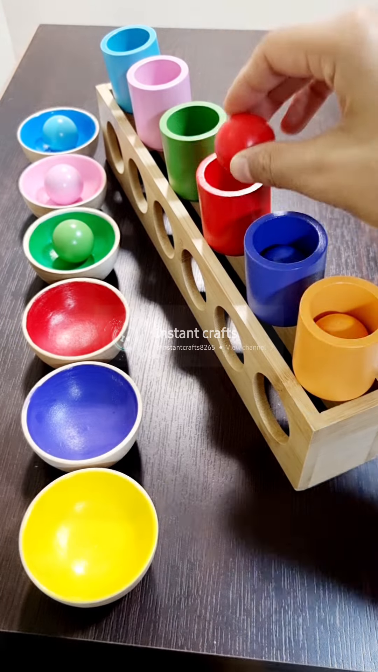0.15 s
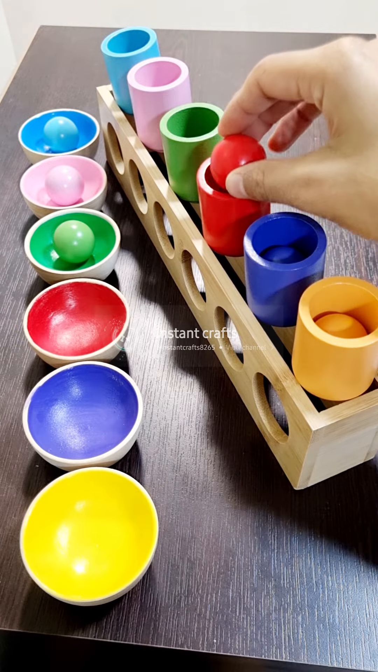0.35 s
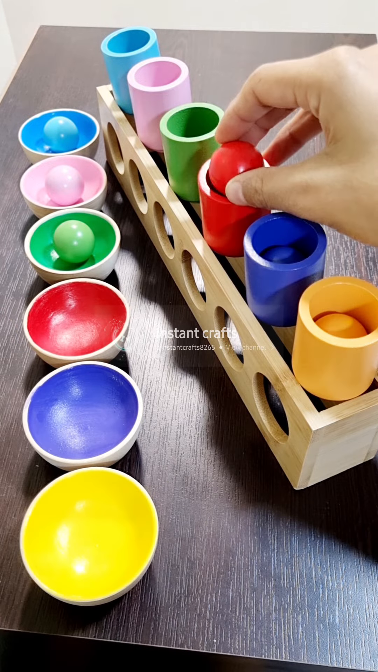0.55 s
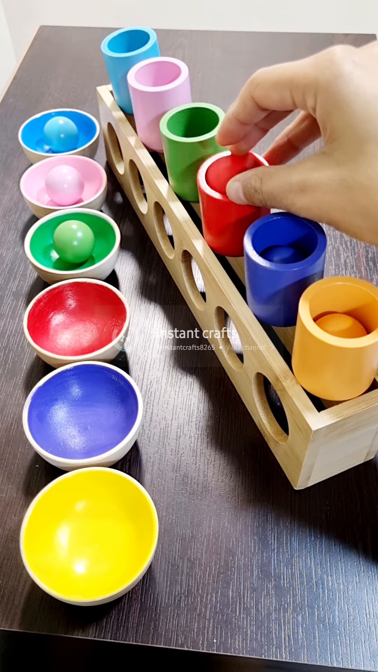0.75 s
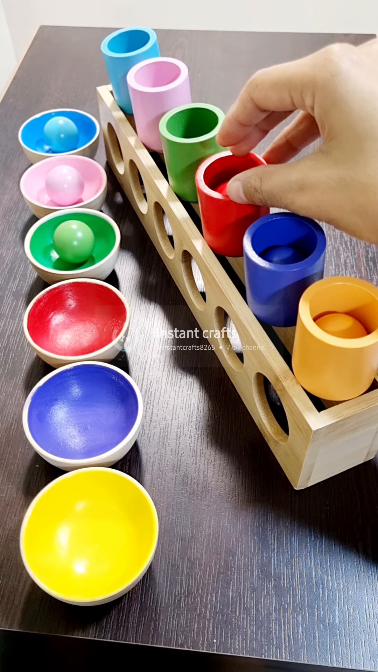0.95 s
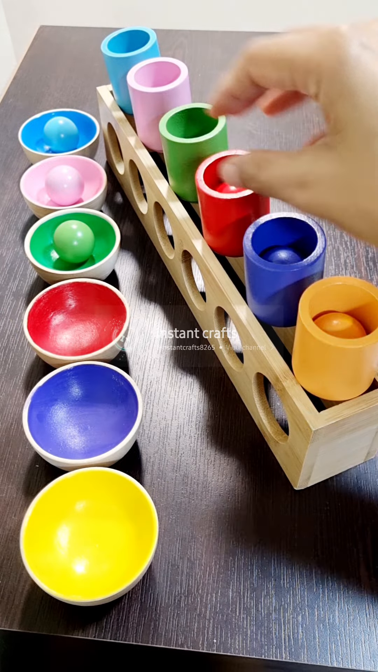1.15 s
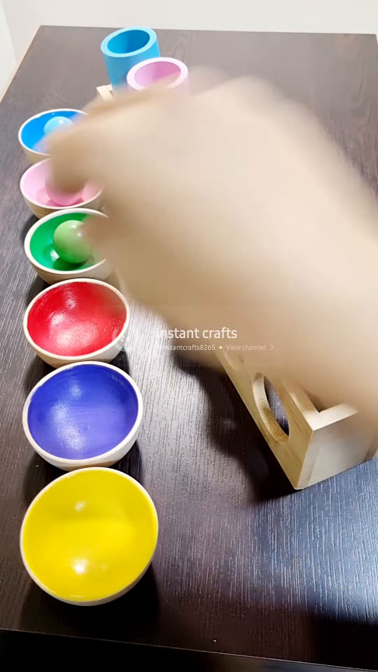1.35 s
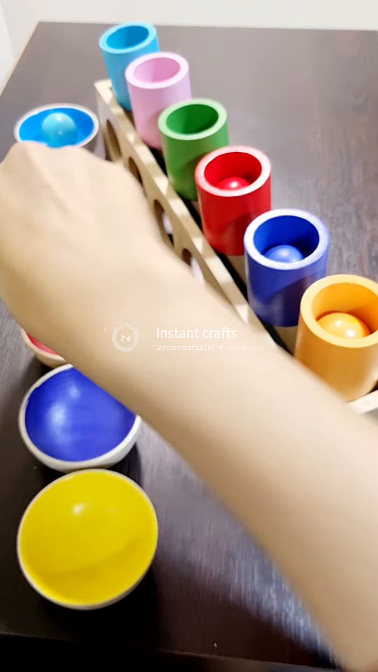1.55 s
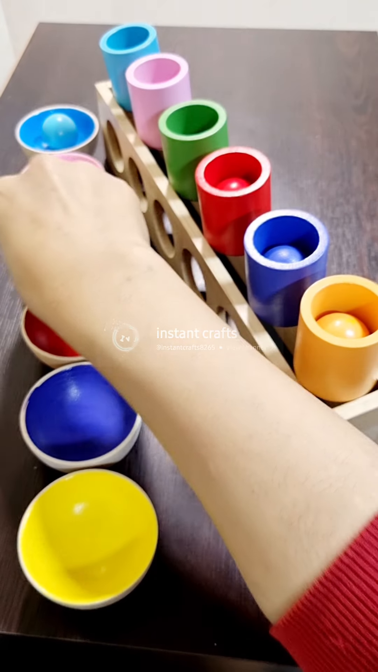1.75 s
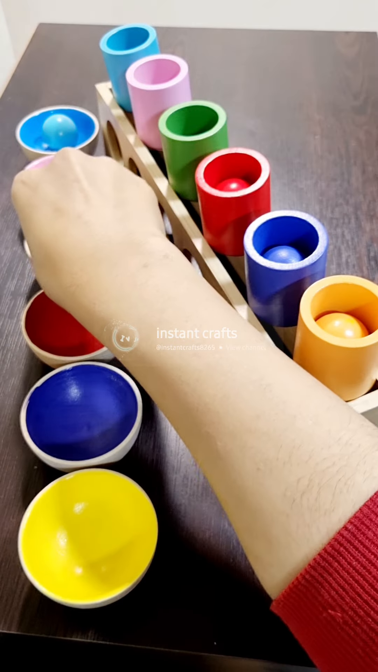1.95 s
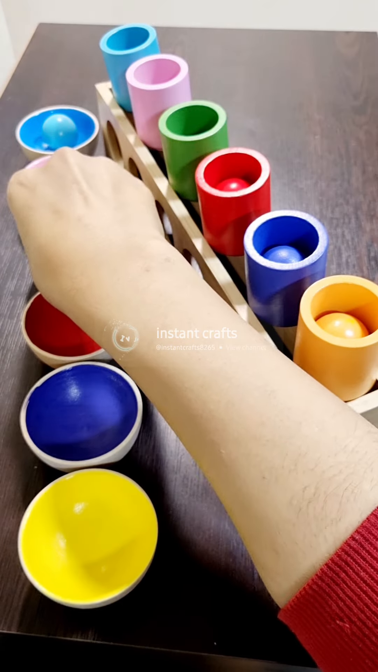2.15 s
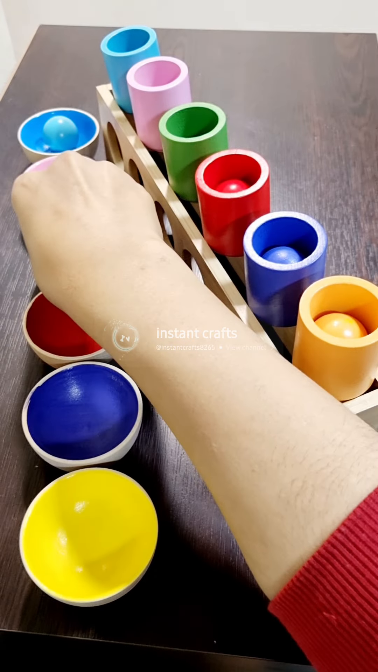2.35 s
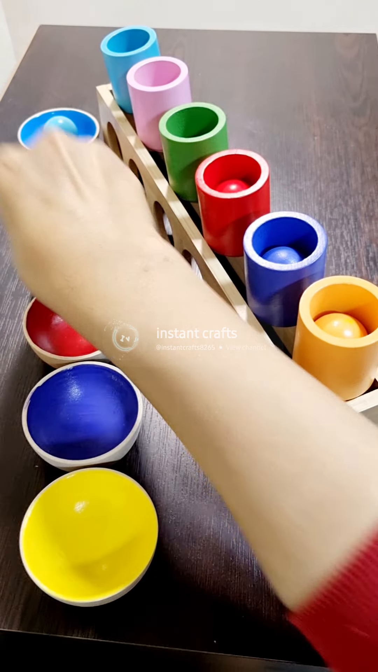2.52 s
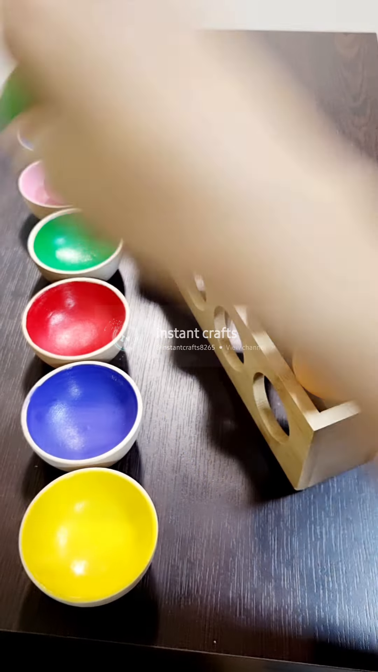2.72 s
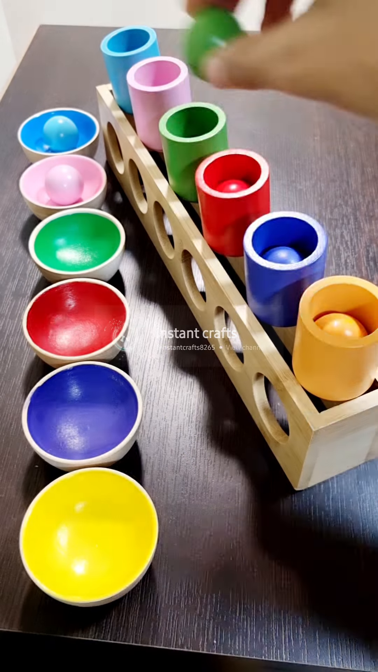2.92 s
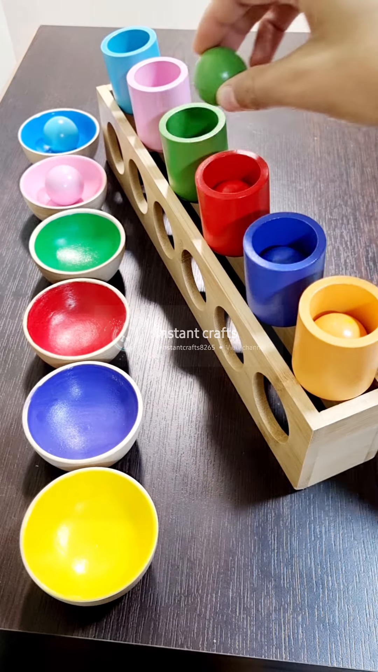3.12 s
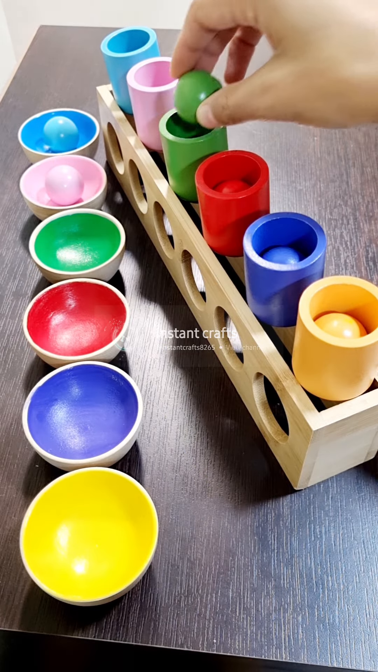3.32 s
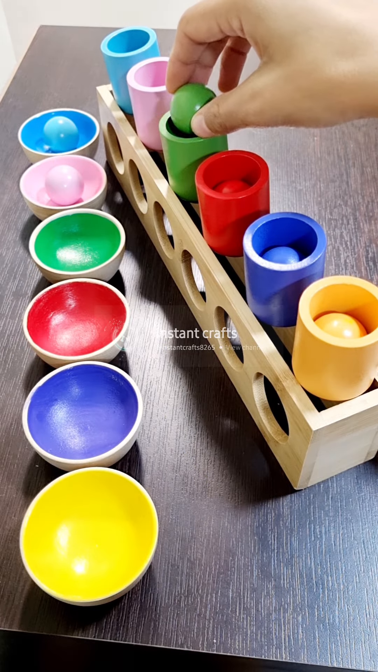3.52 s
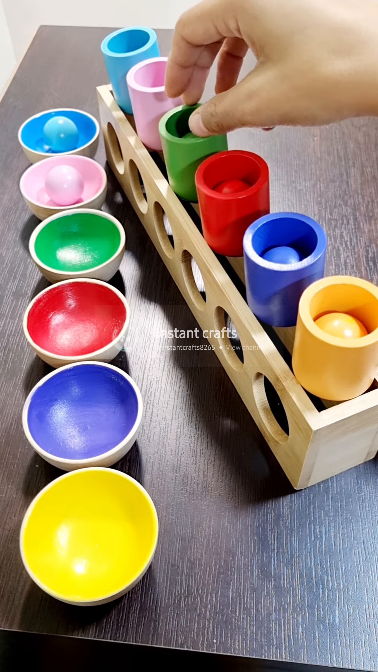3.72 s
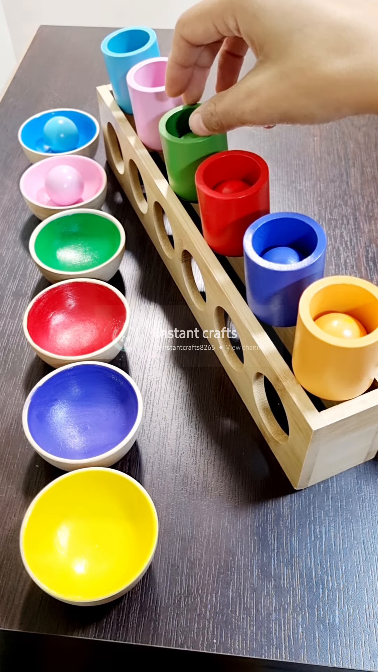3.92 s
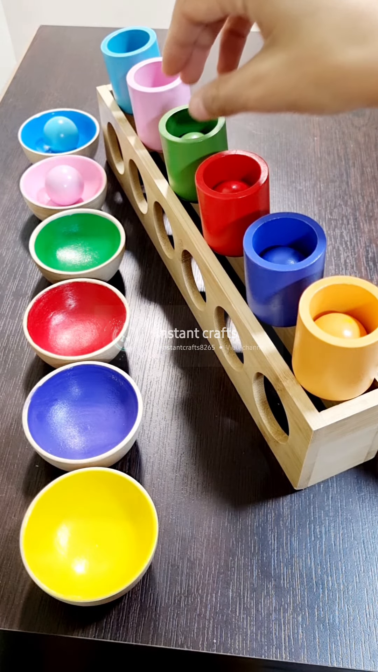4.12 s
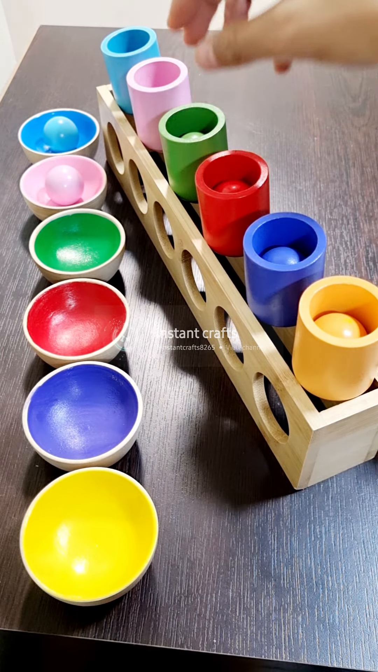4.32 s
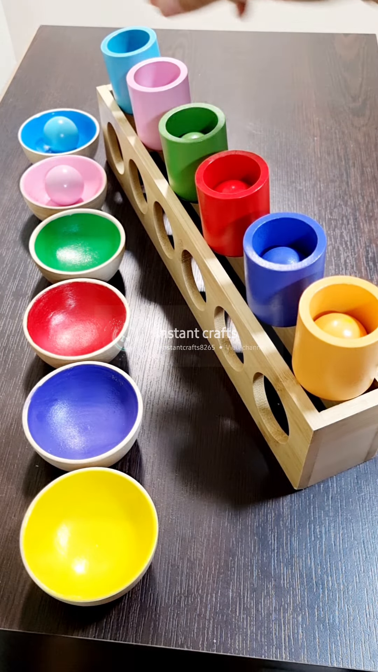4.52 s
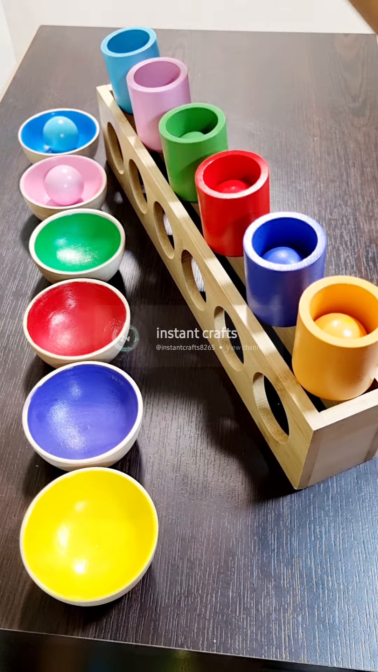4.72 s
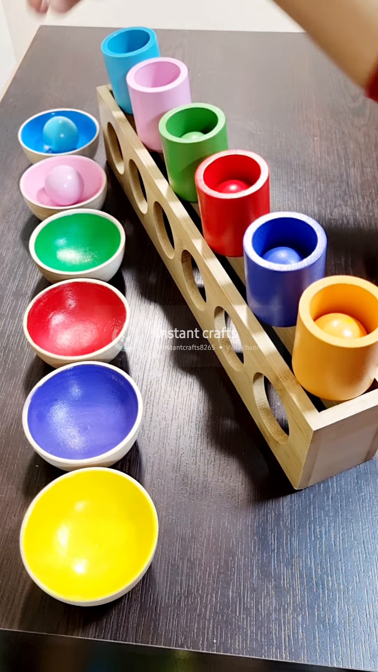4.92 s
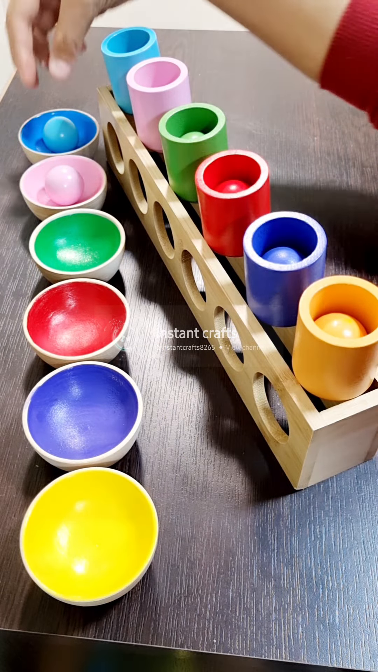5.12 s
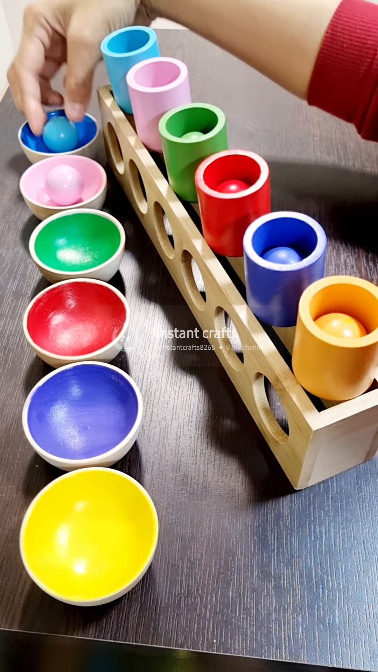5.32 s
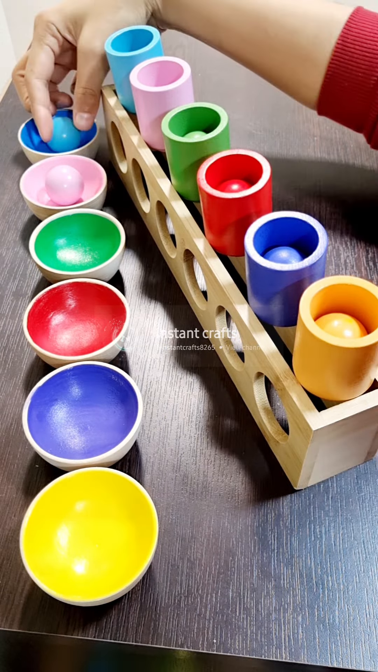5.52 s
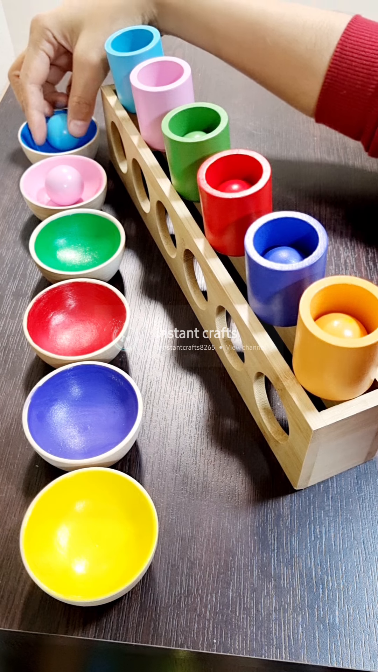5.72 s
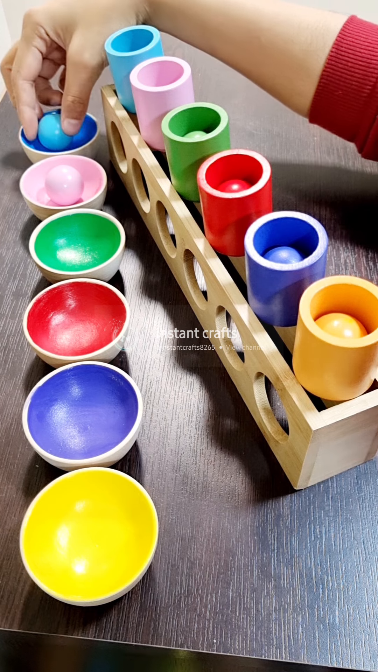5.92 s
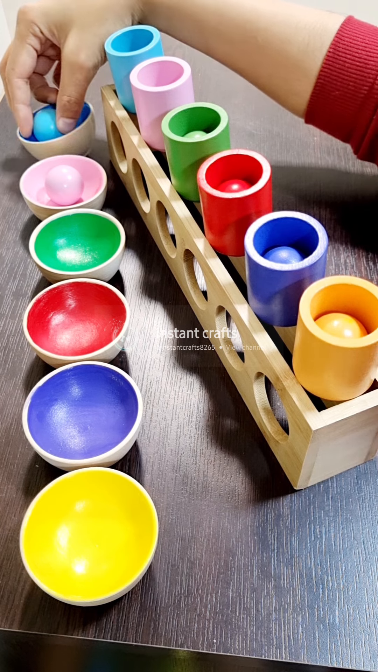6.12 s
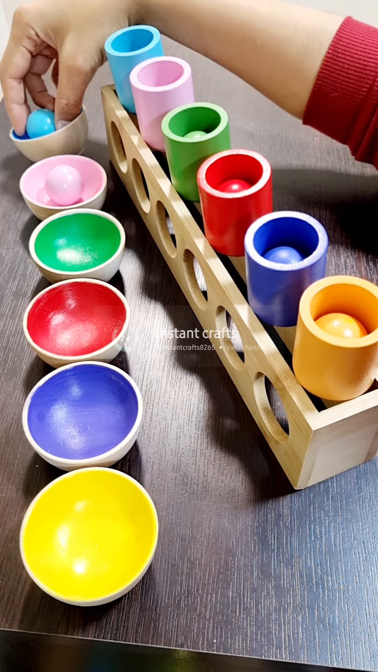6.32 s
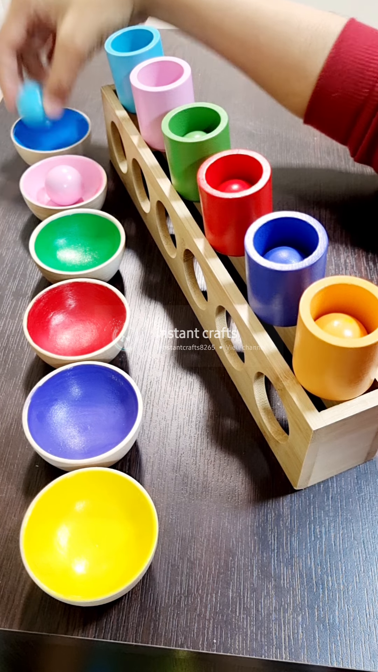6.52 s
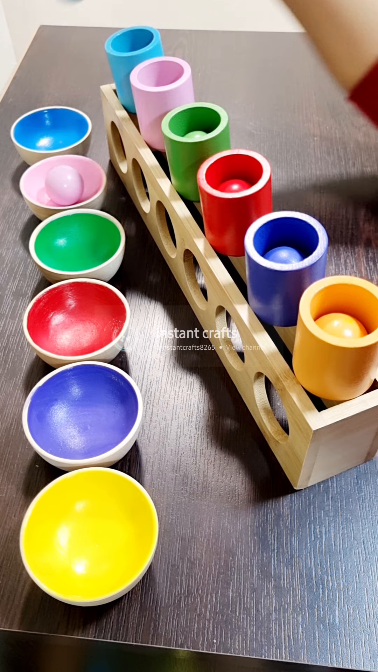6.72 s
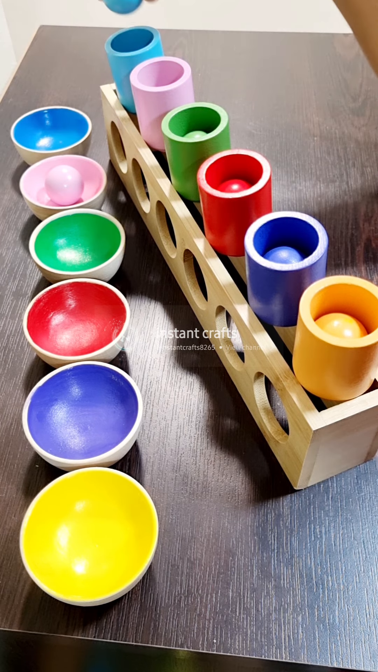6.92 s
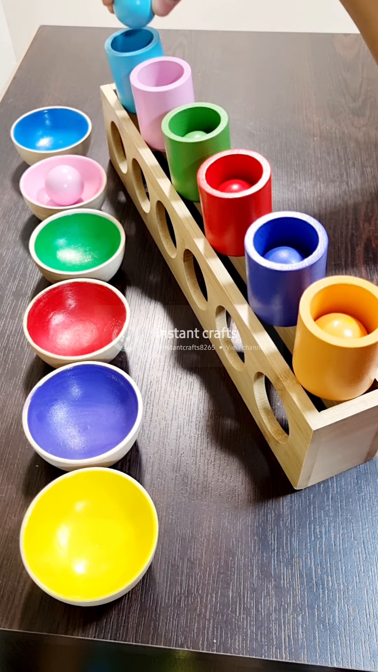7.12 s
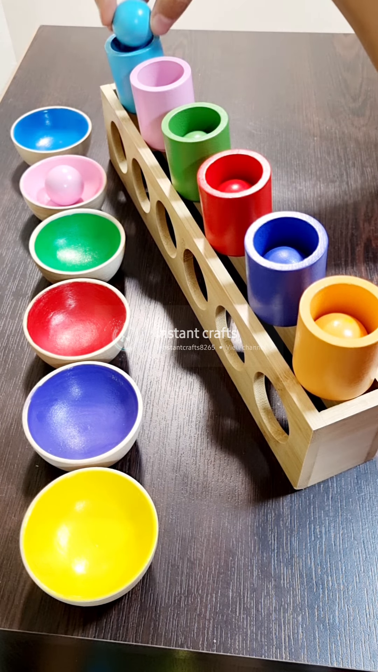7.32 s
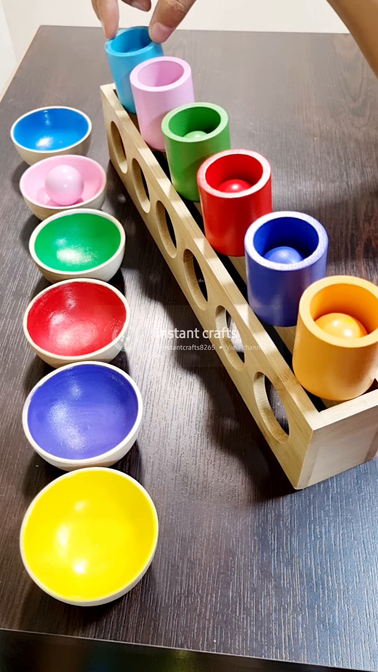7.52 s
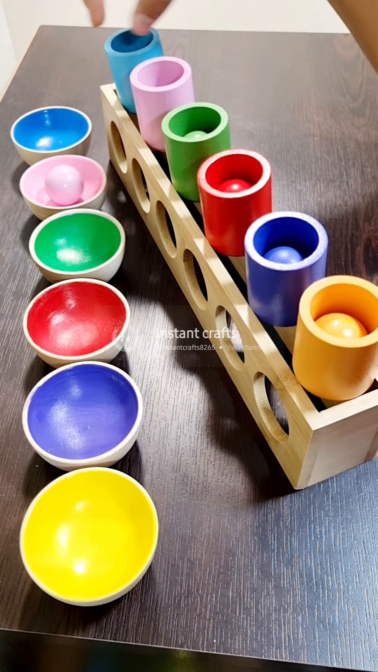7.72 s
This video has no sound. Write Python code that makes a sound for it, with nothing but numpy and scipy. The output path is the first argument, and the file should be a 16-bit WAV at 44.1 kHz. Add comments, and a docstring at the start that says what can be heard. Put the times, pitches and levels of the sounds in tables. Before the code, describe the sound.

Close stereo sound of a hand moving wooden balls into cups on a table. Isolated bright, woody knocks are separated by long near-silent gaps containing only dull rolling, faint finger rubbing and cloth friction. Two cup drops come first, then a loud bowl clack and one last rim click, scrape and drop with table boom. Small lively room, gentle low rumble and hum underneath.

```python
"""Wooden balls into wooden cups

Place: a table in a small live room, where a hand moves wooden balls from shallow bowls into tall cups.
Balls scuff down the cup wall (noise bursts) and land in knocks that ring filtered wood and boom the table.
Once a tilted bowl drops back; balls rolling, fingers and a sleeve rub faintly over a low rumble and hum.
Distance: the direct knock leads its echoes by about 1 ms. Microphone: stereo, knocks up to 0.11 ms apart."""
import sys
import numpy as np
from scipy import signal
from scipy.fft import rfft, irfft, next_fast_len
from scipy.io import wavfile
from scipy.ndimage import uniform_filter1d

SR = 44100
rng = np.random.default_rng(int(sys.argv[2]) if len(sys.argv) > 2 else 0)


def to_wav(sig):
    """Store sig (one row per channel, or 1-D mono) as 16-bit WAV at the path in sys.argv[1].

    Samples outside -1..1 are clipped; the rate is SR.
    """
    pcm = np.clip(np.atleast_2d(sig), -1, 1) * 32767
    pcm = np.round(pcm).astype(np.int16)
    wavfile.write(sys.argv[1], SR, pcm.T)  # frames by channels


N = 346626
TAPS = 4096  # length of one ringing piece of wood [samples]

# Wood strikes wood: (time [s], piece struck, relative level [dB], treble lift [dB], table boom [dB],
# room echo [dB], right channel louder by [dB]); boom and echo come on top of the knock's own level
KNOCKS = [(0.323, "rim", -8.5, 6.5, -27.5, -4, 1.5), (0.7818, "red", 2.5, 0, -8, -4.5, 3.5),
          (0.8016, "red", -8, -8.5, -10.5, -5.5, -1), (0.8076, "red", -7, -10.5, -12.5, -7, 0),
          (0.8166, "red", -11, -4, -11, -2.5, -3.5), (3.4869, "rim", -7.5, 0, -25.5, 1, 1),
          (3.6729, "green", 0, 7, -3.5, -1.5, 1.5), (3.6819, "green", -14.5, -12, -8.5, -6.5, 1),
          (5.661, "ball", -16, -3, -15, -4.5, 0.5), (5.878, "ball", -20.5, -1, -25.5, -4, 3.5),
          (6.2, "ball", -18, 7.5, -25, -1.5, 5), (6.483, "bowl", -1, 9.5, 1.5, -1, 0.5),
          (7.3642, "rim", -6.5, 3, -10, 2.5, 1), (7.487, "blue", 0, 8.5, 3.5, -1, 1),
          (7.5344, "blue", -3.5, -22, 0, -1.5, 0.5)]


def knocks():
    """Each contact rings its piece of wood, heard directly, through the table top and off the walls."""
    out = np.zeros((2, N))
    lead_s = 0.001  # room ahead of the blow for the start of its pulse
    fade = np.minimum(np.linspace(2, 0, TAPS), 1) ** 2
    boom, standing = table_boom(), room_standing_waves()
    for time_s, name, db, treble_db, boom_db, room_db, right_db in KNOCKS:
        wood = struck_wood(name, db, treble_db)
        direct = direct_sound(wood, name, lead_s) * fade
        echo = room(irfft(wood) * fade)
        balance = amp([[-right_db / 2], [right_db / 2]])
        add(out, time_s - lead_s, amp(0.13) * balance * direct)
        add(out, time_s, amp(room_db) * balance * echo)
        add(out, time_s, amp(db) * (amp(boom_db) * boom + standing))
    return out


# Broad colour of a blow on a cup, on a ball damped by the fingers, and on a bowl:
# (frequency before the piece's factor [Hz], relative level [dB])
CUP_BODY = [(50, -4.5), (160, 6), (300, 14), (600, 5.5), (1000, 8.5), (1700, 15), (2400, 9.5), (3700, 5.5),
            (4400, 1), (5000, -6), (6800, -12), (8600, -26), (14500, -18), (18000, -36)]
BALL_BODY = [(100, -18), (300, 1), (600, 3), (850, -13), (1500, -31), (3000, -41.5), (15000, -56.5)]
BOWL_BODY = [(50, -5.5), (160, -1), (300, 19.5), (430, 7), (800, 6), (1500, 10), (3200, 12.5), (4200, 9),
             (5200, -3), (7800, -12), (10500, -18), (16000, -33.5)]
# Resonances standing out of the broad colour, cups named by colour: (frequency [Hz], width [Hz], gain [dB])
RED_MODES = [(456, 31, 10.5), (490, 28, 13), (693.6, 13, 5), (908, 56, 11.5), (1180, 61, 3.5),
             (1360, 48, 6.5), (1538, 136, 0.5), (1730, 370, 12.5), (2262, 390, 4.5), (2840, 158, 1),
             (3330, 320, 9.5), (4130, 450, 9.5)]
GREEN_MODES = [(324, 70, 10), (367, 30, 6.1), (449, 22, 12), (476, 28, 13), (670, 45, 9.4), (780, 85, 7.2),
               (969, 39, 8), (1175, 76, 9.7), (1827, 520, 16), (3220, 450, 6.3), (3980, 450, 7.6),
               (4700, 480, 14)]
BLUE_MODES = [(394, 500, 7.9), (570, 15, 3.6), (675, 32, 7), (803, 87, 5.3), (1176, 45, 8.8),
              (1428, 130, 9.2), (1684, 330, 6.1), (1950, 500, 5.1), (2810, 300, 7.3), (3270, 240, 9.5),
              (3760, 150, 5.9), (5120, 650, 5.2)]
BOWL_MODES = [(215, 35, 7.3), (443, 29, 4.2), (545, 128.7, 6.7), (659, 45, 15), (851, 40, 11.5),
              (939, 130, 5.6), (1436, 100, 9), (1790, 460, 6.9), (2380, 120, 2.79), (2880, 67, 3.2),
              (3580, 210, 1.4), (4380, 300, 6.1)]
# The pieces by name: (broad colour, factor on its frequencies, resonances,
# thin top ping as (frequency [Hz], width [Hz], gain [dB]))
PIECES = {"red": (CUP_BODY, 0.92, RED_MODES, (11600, 1800, 11)),
          "green": (CUP_BODY, 0.91, GREEN_MODES, (15000, 3500, 13)),
          "blue": (CUP_BODY, 1, BLUE_MODES, (14000, 800, 12)),
          "bowl": (BOWL_BODY, 0.83, BOWL_MODES, (13000, 970, 3)), "ball": (BALL_BODY, 1.0, [],
          (7400, 1800, 3.79)), "rim": (BALL_BODY, .8, [(1540, 640, 35.5), (3057, 500, 19.5)],
          (7700, 900, 22))}


def struck_wood(name, db, treble_db, treble_hz=3400.0):
    """Spectrum of a struck piece: broad colour plus resonances, in minimum phase so it rings after the blow."""
    hz = np.fft.rfftfreq(TAPS, 1 / SR)
    body, pitch, modes, ping = PIECES[name]
    colour_db = read(body, hz / pitch) + peaks([*modes, ping], hz)
    lift_db = treble_db * hz ** 2 / (hz ** 2 + treble_hz ** 2)
    log_gain = np.log(amp(db + colour_db + lift_db))
    # the Hilbert transform of the log gain gives the minimum phase
    mirrored = np.r_[log_gain, log_gain[-2:0:-1]]
    phase = -signal.hilbert(mirrored).imag[:len(hz)]
    return np.exp(log_gain + 1j * phase)


# Where each piece stands: name: (right channel hears it later by [ms])
LAG_MS = {"red": 0.11, "green": -0.097, "blue": .1, "bowl": -0.033, "ball": 0., "rim": 0.034}


def direct_sound(wood, name, lead_s):
    """The straight path: the contact drives the wood, and the farther channel hears it later."""
    hz = np.fft.rfftfreq(TAPS, 1 / SR)
    lag_ms = np.array([[-LAG_MS[name]], [LAG_MS[name]]])
    delays_s = lead_s + np.maximum(lag_ms, 0) / 1000
    return irfft(wood * contact(hz) * np.exp(-2j * np.pi * hz * delays_s))


def contact(hz, spread_ms=1.1, spread_hz=2900.0, chatter_s=0.0021, chatter_hz=4600.0):
    """Spectrum of one contact: a pulse whose low part lags as a bending wave, and a brief treble chatter."""
    lag_s = spread_ms / 1000 * np.exp(-(hz / spread_hz) ** 2)
    late = 2 * np.pi * np.cumsum(lag_s) * hz[1]
    chatter = rng.standard_normal(TAPS) * np.exp(-np.arange(TAPS) / SR / chatter_s)
    chatter_spectrum = rfft(chatter / np.linalg.norm(chatter))
    share = hz ** 2 / (hz ** 2 + chatter_hz ** 2)  # the chatter's share of the power
    return np.sqrt(1 - share) * np.exp(-1j * late) + np.sqrt(share) * chatter_spectrum


# Modes of the table top: (frequency [Hz], relative level [dB], 60 dB decay [s])
TABLE = [(224, -24, 0.15), (225.7, -18, 0.2), (232.6, -30, 0.45), (248.5, -26, 0.25), (337, -41, 0.45),
         (374.7, -38, 0.18)]


def table_boom():
    """A blow sets the low modes of the table top swinging."""
    return ring(TABLE, rise=0.021)


# Standing waves of the room: (frequency [Hz], relative level [dB], 60 dB decay [s])
ROOM_MODES = [(88, -33.5, 0.41), (124.24, -34.5, 0.39)]


def room_standing_waves():
    """Standing waves between the walls, slow to build."""
    return ring(ROOM_MODES, rise=0.029)


def ring(modes, rise):
    """Low modes take a time constant, rise [s], to swing up, then hum out, alike in both channels."""
    t = np.arange(SR) / SR
    swing = np.zeros(SR)
    for hz, db, t60 in modes:
        swing += amp(db) * np.exp(-np.log(1000) * t / t60) * np.sin(2 * np.pi * hz * t)
    return swing * (1 - np.exp(-t / rise)) * np.ones((2, 1))


# A ball scuffs the cup wall on its way in; the abrupt one at 7.36 s is the bright edge of its knock
# on the rim: (start [s], rise [s], 20 dB fade [s], relative level [dB])
SCUFFS = [(.658, .066, .04, -48), (3.56, .05, 0.17, -43.5), (7.36, 0.0032, 0.025, -39.5),
          (7.385, .035, 0.24, -45.5)]
# Their broad colour: (frequency [Hz], relative level [dB])
SCUFF_BODY = [(100, -10), (350, 7), (800, -0.5), (1500, -8.5), (2300, -17), (4200, -21), (9000, -38.5),
              (14000, -26.5), (16000, -48.5)]
# Their resonances: (frequency [Hz], width [Hz], gain [dB])
SCUFF_MODES = [(1440, 260, 14.5), (3080, 420, 20.5), (7320, 830, 22.5), (10500, 1000, 12),
               (14400, 900, 7.5)]


def scuffs():
    """Slips of a ball on the cup wall, and the bright edge of one rim knock, excite the wood."""
    return amp(-7.5) * rub(SCUFFS, SCUFF_BODY, SCUFF_MODES, slips_per_s=950, hiss=0.57, room_db=3.0, grip_db=2.5)


# Fingers roll a ball in its bowl: (start [s], rise [s], 20 dB fade [s], relative level [dB])
ROLLS = [(1.735, 0.061, 0.1, -46.5), (2.02, 0.043, 0.11, -51.5), (2.24, 0.073, .15, -68),
         (5.41, 0.072, 0.032, -56), (5.63, .03, 0.043, -58)]
# Its broad colour: (frequency [Hz], relative level [dB])
ROLL_BODY = [(100, -11), (230, 6), (360, -1), (720, -5.5), (1150, -16.5), (1600, -27.5), (3000, -48),
             (8000, -70)]
# The bowl under the ball: (frequency [Hz], width [Hz], gain [dB])
ROLL_MODES = [(490, 99, 7), (720, 170, 5), (1110, 180, 7)]


def rolls():
    """A rolling ball drives the low resonances of its bowl with small slips."""
    return amp(0.5) * rub(ROLLS, ROLL_BODY, ROLL_MODES, slips_per_s=370, hiss=0.49, room_db=-4, grip_db=0.5)


# Fingertips slide on paint: (start [s], rise [s], 20 dB fade [s], relative level [dB])
FINGERS = [(.36, .04, 0.034, -74), (1.76, .045, .03, -76.5), (1.87, 0.024, 0.065, -74.5),
           (2.15, 0.086, 0.17, -77), (2.265, 0.044, 0.052, -67.5), (5.4, 0.053, 0.04, -60.5),
           (5.57, 0.07, .08, -73.5), (5.7, 0.082, .16, -74.5)]
# Their broad colour: (frequency [Hz], relative level [dB])
FINGER_BODY = [(760, -34.5), (1300, 2), (2080, -4), (2580, -14), (2770, -16), (4390, -14), (5120, -20),
               (6420, -14), (8460, -17), (11500, -26), (15000, -32)]
# A faint squeak: (frequency [Hz], width [Hz], gain [dB])
FINGER_MODES = [(3400, 250, 7), (8600, 800, 8), (10200, 830, 1)]


def fingers():
    """Skin sliding on paint: more hiss than slips, with a faint squeak."""
    return amp(-6.0) * rub(FINGERS, FINGER_BODY, FINGER_MODES, slips_per_s=560, hiss=2, room_db=3, grip_db=3.0)


# The sleeve brushes as the arm moves: (start [s], rise [s], 20 dB fade [s], relative level [dB])
SLEEVE = [(1.38, .14, .3, -84), (4.08, 0.041, .2, -71), (4.16, 0.055, 0.09, -67.5), (4.46, .04, 0.1, -60.5),
          (4.45, 0.41, 0.46, -69.5), (4.85, 0.11, 0.31, -70.5)]
# Its broad colour: (frequency [Hz], relative level [dB])
SLEEVE_BODY = [(1060, -13.5), (1800, -4), (2280, -6.5), (2620, -11.5), (3320, -11), (6840, -19.5),
               (11000, -23), (13000, -19), (14900, -23), (16000, -40)]


def sleeve():
    """Cloth friction: dense slips without resonances."""
    return amp(-6.5) * rub(SLEEVE, SLEEVE_BODY, [], slips_per_s=1600, hiss=0.79, room_db=6.0, grip_db=2)


def rub(strokes, body, modes, slips_per_s, hiss, room_db, grip_db):
    """Friction: tiny random slips over a smooth hiss drive the rubbed body, while the grip comes and goes."""
    size = next_fast_len(N)
    hz = np.fft.rfftfreq(size, 1 / SR)
    slips = rng.standard_normal(size) * (rng.random(size) < slips_per_s / SR)
    drive = rfft(unit(slips) + hiss * rng.standard_normal(size))
    colour = amp(read(body, hz) + peaks(modes, hz))
    friction = unit(irfft(drive * colour, size))[:N]
    grip = unit(uniform_filter1d(rng.standard_normal(N), size=400))  # smoothed over 9 ms
    sound = friction * effort(strokes) * amp(grip_db * grip)
    return sound + amp(room_db) * room(sound)[:, :N]


def effort(strokes):
    """Gain of a set of strokes: each swells smoothly to its peak, then drops 20 dB per fade time."""
    t, power = np.arange(N) / SR, np.zeros(N)
    for start, rise, fade, db in strokes:
        swell = np.sin(np.pi / 2 * np.clip((t - start) / rise, 0, 1)) ** 2
        release_db = -20 * np.clip((t - start - rise) / fade, 0, 10)
        power += (swell * amp(db + release_db)) ** 2
    return np.sqrt(power)


# Echo colour of the room: (frequency [Hz], relative level [dB])
ROOM_LEVEL = [(70, 14.5), (120, 13), (165, 2), (215, 7), (300, -0.5), (600, 5), (1000, 6), (1750, 1),
              (3000, 2.5), (5000, 0), (9000, 1.5), (14000, -3.5)]
# How long the echoes last: (frequency [Hz], 60 dB decay [s])
ROOM_T60 = [(100, 0.84), (300, .42), (800, 0.49), (1800, 0.56), (4000, 0.49), (6500, 0.35), (9000, 0.18),
            (14000, 0.32)]


def room(x, gap_s=0.00098, build_s=0.00085, early=0.61, early_s=0.074):
    """Echoes from one spot: strong near reflections, then a tail with each band dying at its own speed."""
    hz, t, z = signal.stft(irfft(diffuse(SR)[1]), SR, nperseg=512)
    rate = np.log(1000) / np.maximum(read(ROOM_T60, hz), .05)[:, None]
    # the square root evens out the energy of short and long tails
    z = z * amp(read(ROOM_LEVEL, hz))[:, None] * np.sqrt(2 * rate / SR) * np.exp(-rate * t)
    tail = signal.istft(z, SR, nperseg=512)[1][:, :SR]
    t = np.arange(SR) / SR
    onset = np.clip((t - gap_s) / build_s, 0, 1)
    near = (1 + early * np.exp(-(t / early_s) ** 2)) / (1 + early / 2)
    return signal.fftconvolve(x[None], onset * near * tail, axes=1)


# Likeness of the stereo channels: (frequency [Hz], left-right correlation [-1 to 1])
ROOM_SAME = [(100, 0.98), (250, 0.88), (500, 0.47), (1000, -0.27), (2000, 0.013), (8000, -0.13)]


def diffuse(size):
    """Spectrum of noise arriving from all sides: closely alike in both channels only in the bass."""
    hz = np.fft.rfftfreq(size, 1 / SR)
    a, b = rfft(rng.standard_normal((2, size)))
    same = np.clip(read(ROOM_SAME, hz), -1, 1)
    return hz, np.array([a, same * a + np.sqrt(1 - same ** 2) * b])


# The quiet room: (frequency [Hz], relative level [dB per Hz])
AIR = [(12, -57.5), (20, -21), (58, -11.5), (79, -2), (98, -3), (187, -17), (222, -13), (285, -16.5),
       (377, -30.5), (410, -27.5), (642, -36), (825, -33), (1290, -32.5), (3950, -63), (16000, -67)]
# Its hum lines: (frequency [Hz], rms level [dB])
HUM = [(82, -65.5), (99, -57), (224, -65), (279, -66)]


def background(air_db=-50.5, hum_width_hz=2.5):
    """Low rumble of the room, shaped noise, with hum lines that waver as narrow bands of noise."""
    size = next_fast_len(N)
    hz, z = diffuse(size)
    sound = amp(air_db) * unit(irfft(z * amp(read(AIR, hz)), size))
    z = diffuse(size)[1]
    for line_hz, db in HUM:
        line = z / (1 + ((hz - line_hz) / hum_width_hz) ** 4)
        sound += amp(db) * unit(irfft(line, size))
    return sound[:, :N]


def amp(db):
    """Decibels to gain."""
    return 10 ** (np.asarray(db) / 20)


def unit(x):
    """Scales to an rms of one."""
    return x / np.sqrt(np.mean(x ** 2) + 1e-20)


def read(points, hz):
    """Joins (frequency [Hz], value) points by straight lines on a log-frequency axis."""
    f, value = np.transpose(points)
    return np.interp(np.log(hz + 1), np.log(f + 1), value)


def peaks(modes, hz):
    """Gain in dB of a set of resonances."""
    return sum(db / (1 + (2 * (hz - f) / width) ** 2) for f, width, db in modes)


def add(mix, time_s, sound):
    """Mixes a stereo sound in at a time."""
    part = mix[:, round(time_s * SR):][:, :sound.shape[1]]
    part += sound[:, :part.shape[1]]


def scene():
    """Knocks, handling noise and the room."""
    return knocks() + scuffs() + rolls() + fingers() + sleeve() + background()


def record(dry, ceiling=1.0, edge_hz=16000):
    """The microphone signal: the sharpest peaks are rounded off, then a low-pass limits the band."""
    limited = dry / (1 + (dry / ceiling) ** 4) ** (1 / 4)
    low_pass = signal.firwin(255, edge_hz, window=("kaiser", 8), fs=SR)
    return signal.oaconvolve(limited, low_pass[None], "same")


dry = scene()
out = record(dry)
to_wav(out)
```